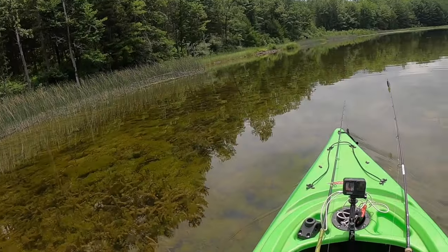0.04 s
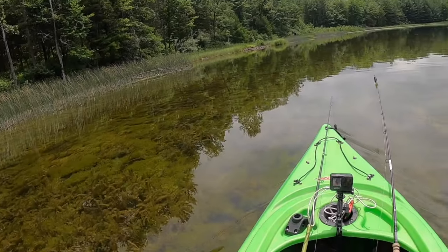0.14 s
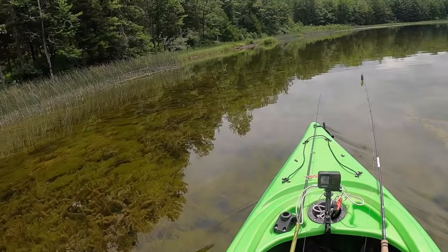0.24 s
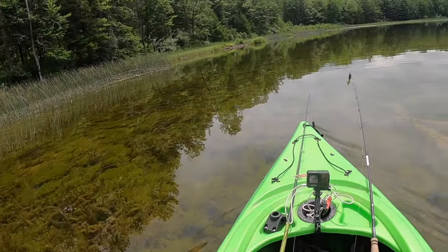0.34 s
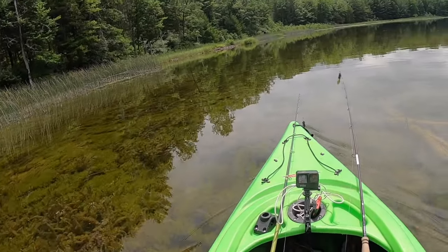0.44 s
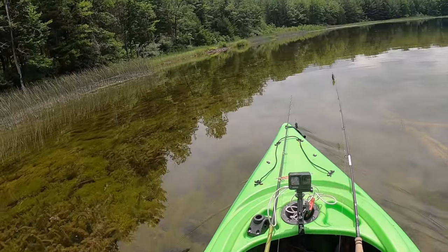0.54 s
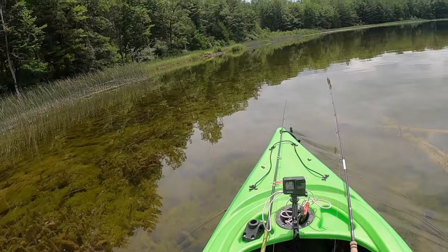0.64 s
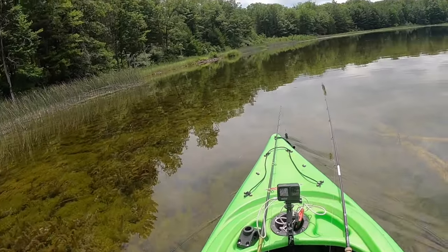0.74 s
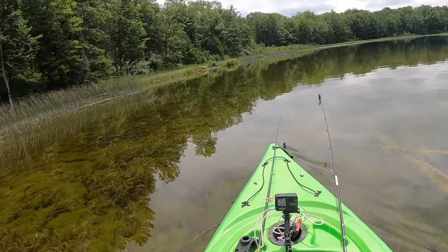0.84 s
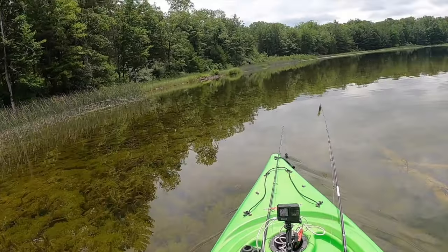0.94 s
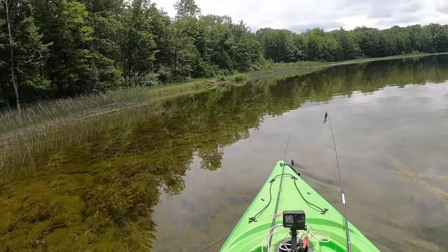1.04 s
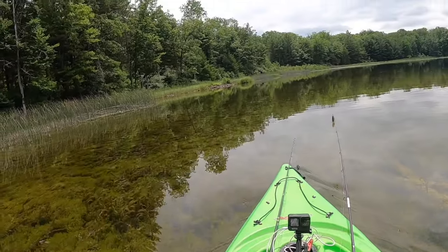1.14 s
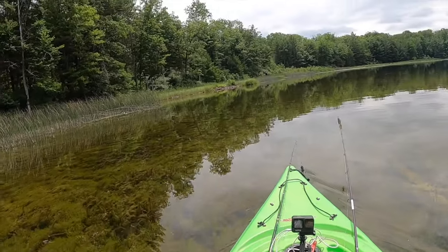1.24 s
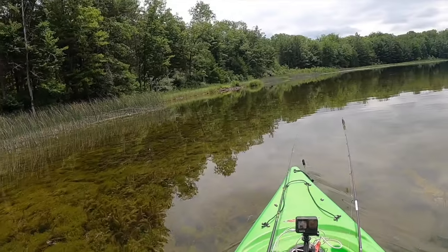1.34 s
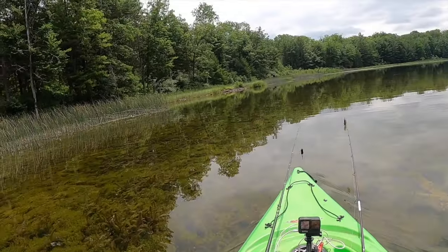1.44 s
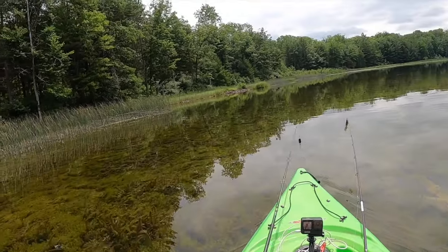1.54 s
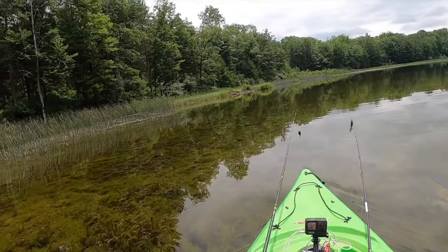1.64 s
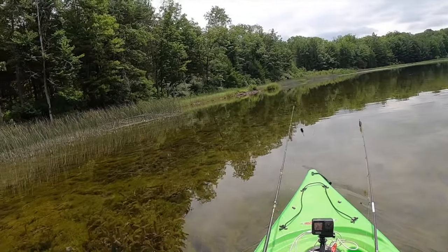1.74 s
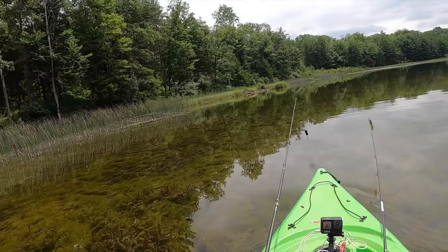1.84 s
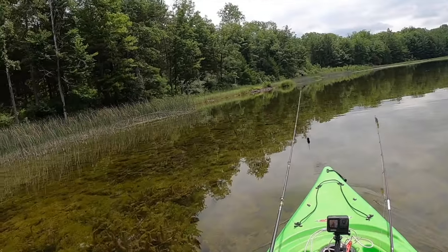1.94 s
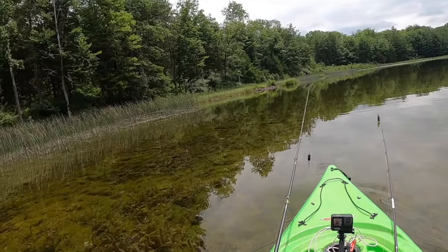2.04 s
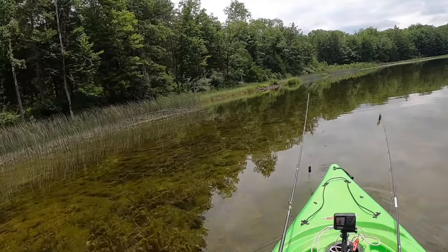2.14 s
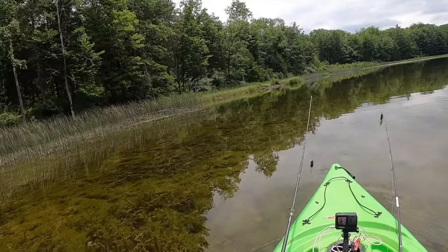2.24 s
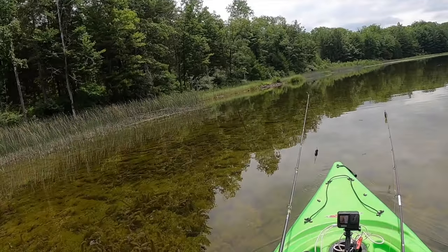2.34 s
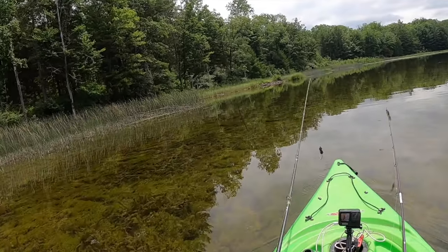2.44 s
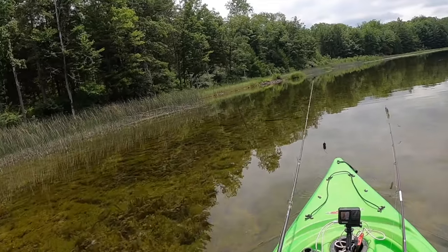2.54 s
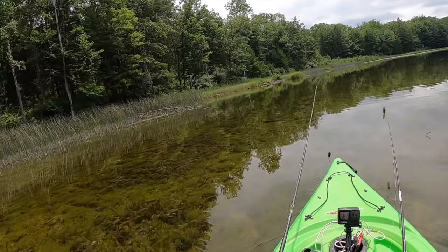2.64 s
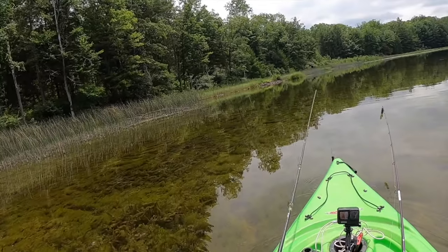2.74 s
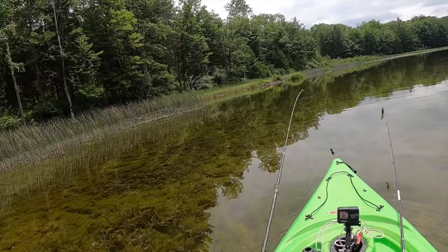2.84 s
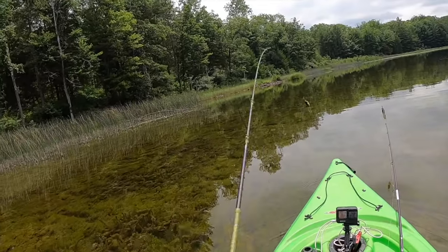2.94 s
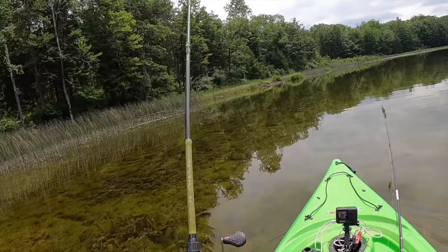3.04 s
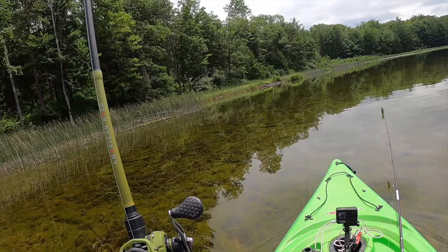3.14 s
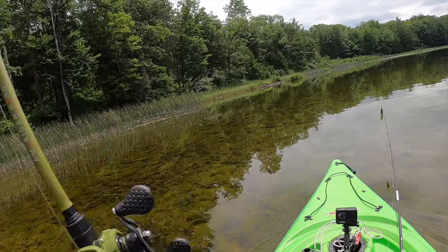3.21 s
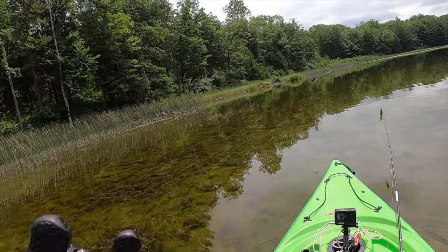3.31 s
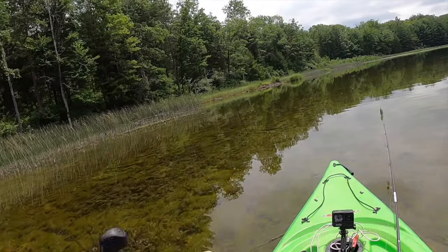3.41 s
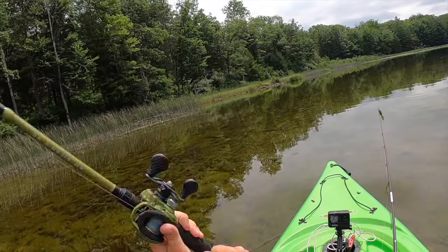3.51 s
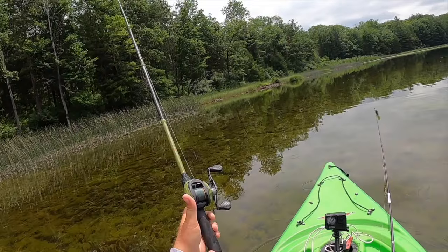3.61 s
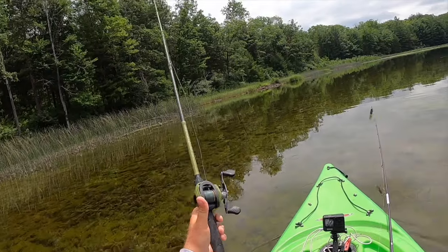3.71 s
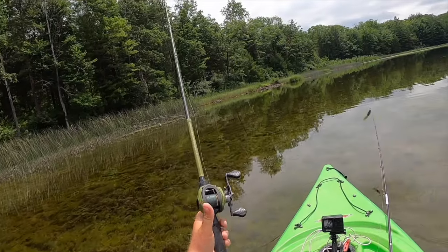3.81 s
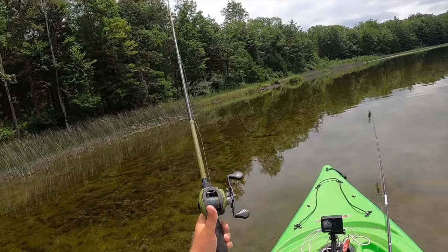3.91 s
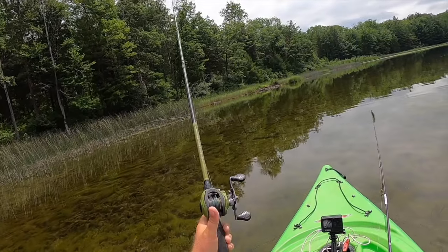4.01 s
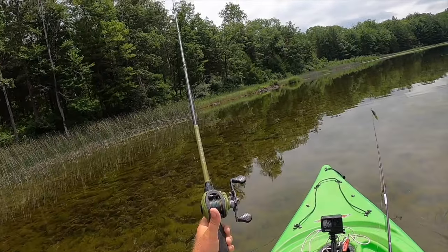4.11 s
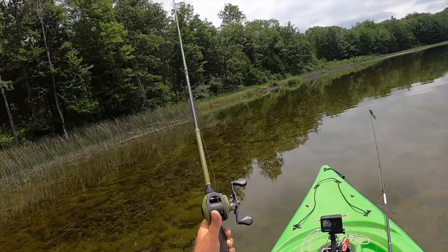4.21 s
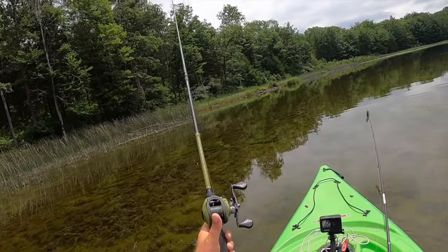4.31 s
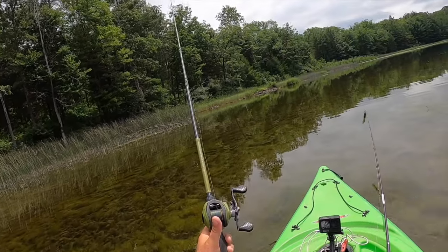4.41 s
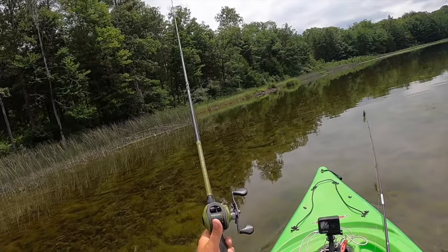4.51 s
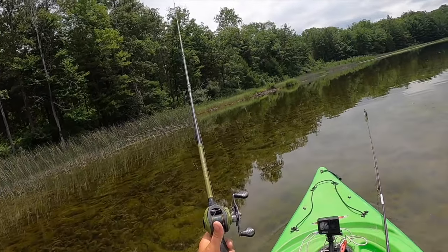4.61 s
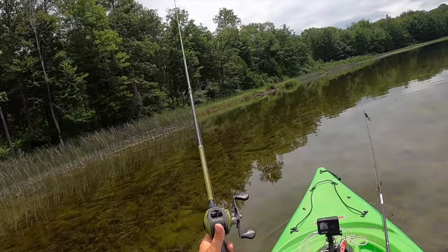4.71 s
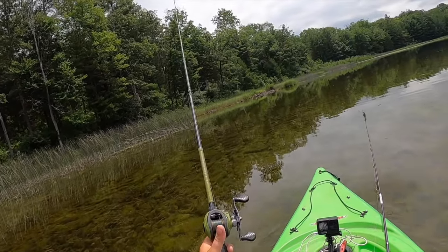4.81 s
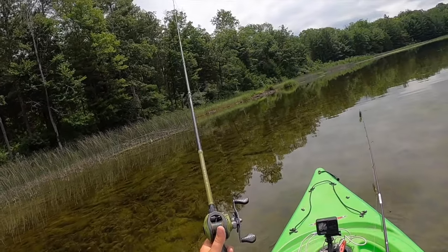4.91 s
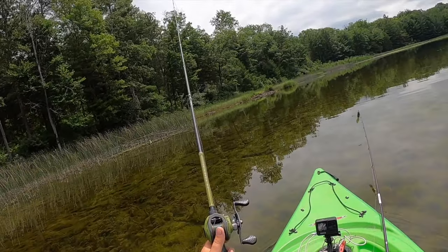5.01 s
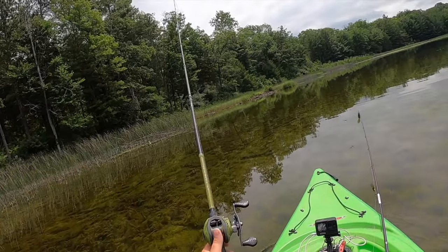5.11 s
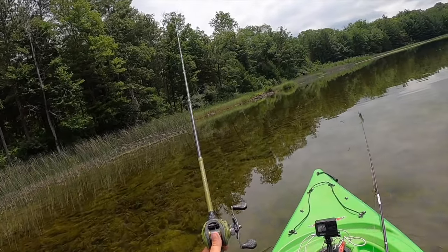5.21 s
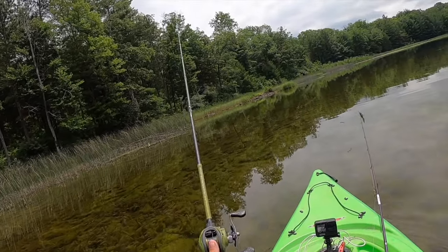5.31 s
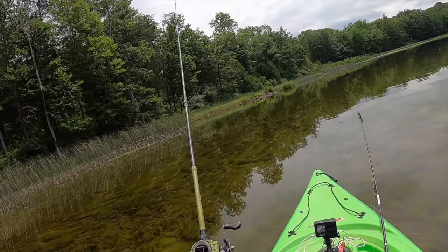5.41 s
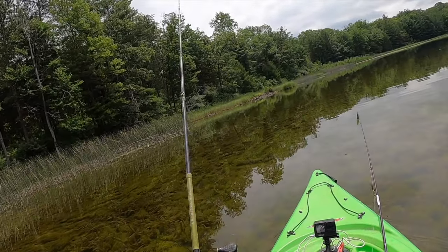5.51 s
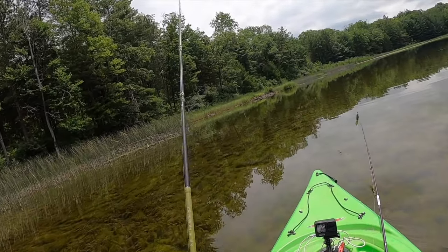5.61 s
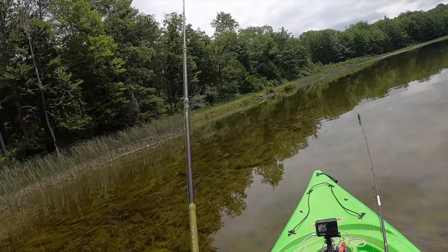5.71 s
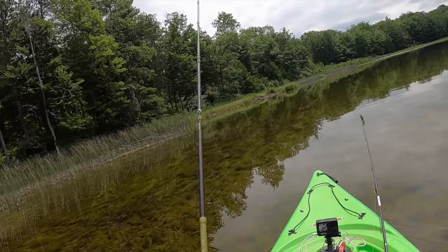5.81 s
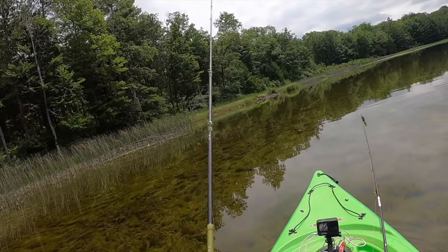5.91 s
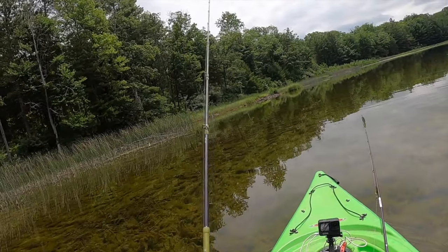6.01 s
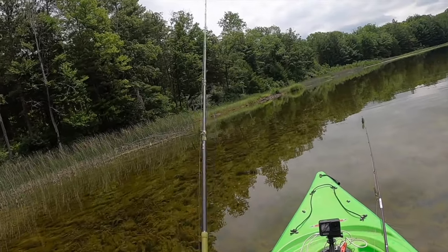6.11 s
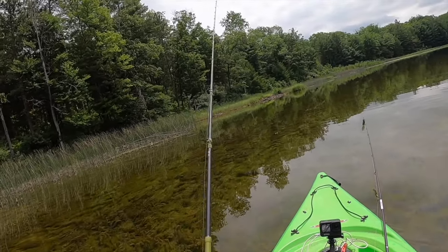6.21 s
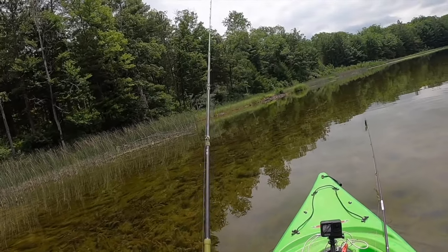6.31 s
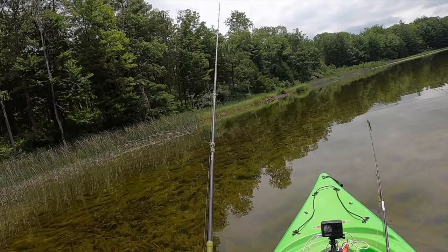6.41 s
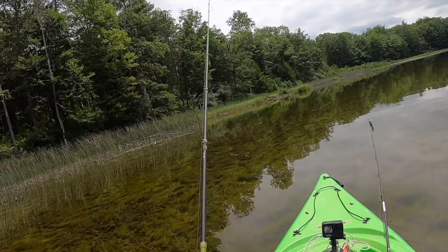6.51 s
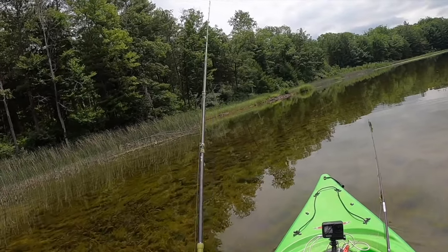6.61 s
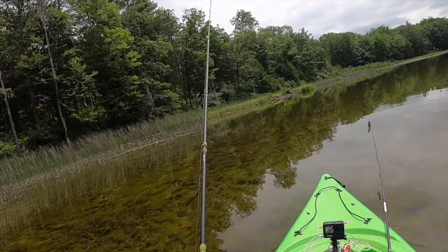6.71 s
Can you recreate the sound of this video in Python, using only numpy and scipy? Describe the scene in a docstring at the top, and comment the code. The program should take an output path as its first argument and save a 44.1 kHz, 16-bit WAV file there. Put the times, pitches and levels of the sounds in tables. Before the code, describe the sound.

A fishing reel gives three crisp metallic clacks close by, with small ticks between them. A brief whoosh of the rod follows, then a faint slowing spool whir and the hiss of line, before the reel snaps back with a final click. Soft knocks come from the kayak. Around it all is a calm wooded lakeshore with distant warbling birds, light leaf rustle and a barely audible motor hum.

```python
"""Calm lake, from a kayak: one cast. The reel's clutch clacks three times, contacts ringing its frame;
reeds and trees echo it. The rod swishes, the spool whirs down as line runs out, the clutch snaps back.
Songbirds call from the wooded shore, a fly's wings buzz past, sleeves rub, the hull knocks, water plops.
Behind it all: low rumble, leaf rustle, a fine high hiss and a far motor's hum."""
import sys
import numpy as np
from scipy import signal
from scipy.fft import rfft, irfft
from scipy.io import wavfile
from scipy.ndimage import uniform_filter1d

SR = 44100
rng = np.random.default_rng(int(sys.argv[2]) if len(sys.argv) > 2 else 0)


def digitize_waveform(pressure):
    """Quantize a signal to 16-bit integers and store it at the path in sys.argv[1].

    Rows of a 2-D input are taken as channels; values are limited to [-1, 1].
    """
    field = np.atleast_2d(pressure).T
    bounded = np.clip(field, -1, 1)
    quanta = np.round(bounded * 32767).astype(np.int16)
    wavfile.write(sys.argv[1], SR, quanta)


N = 297675
TIME_S = np.arange(N) / SR

# far motor: time_s, level_db
MOTOR_LEVELS = [(0, -63.5), (2.3, -66), (2.8, -80), (4.8, -81.5), (5.3, -68.5), (6.75, -80)]
# low rumble: freq_hz, gain_db
RUMBLE_SPECTRUM = [(15, -24), (35, -3.5), (75, -4), (120, -2.5), (170, 2.5), (260, -6.5), (400, -14.5),
                   (800, -23.5), (2000, -58)]
# open air: time_s, leaves_db, fine_hiss_db
AIR_LEVELS = [(0, -57, -74), (1.3, -64, -75), (2.3, -62.5, -74.5), (2.75, -70, -79), (3.5, -58, -70),
              (5.0, -73.5, -66), (5.5, -59, -71.5), (6.75, -61.5, -66.5)]
# leaves: freq_hz, gain_db
LEAF_SPECTRUM = [(210, -47.5), (350, -2), (487, -9), (542, -13), (780, -10), (1240, 1), (1480, -4.5),
                 (1760, -7.5), (2150, -5.5), (2550, -4.5), (2780, -0.5), (3520, -10.5), (4500, -47.5),
                 (5850, -49), (9900, -120)]
# fine high hiss: freq_hz, gain_db
FINE_HISS_SPECTRUM = [(2350, -6.5), (4000, -0.5), (4490, -3.5), (5160, -1), (5830, -3), (6880, -6.5),
                      (7510, -5.5), (7990, -13.5), (8870, -9.5), (10800, -24.5), (12700, -21.5),
                      (13700, -33), (15000, -44.5)]
# rubs, and high hissy tails echoing after the first two clacks (1.768 s, 2.468 s):
# middle_s, length_s, level_db, centre_hz, spread_oct
RUBS_AND_TAILS = [(.02, 0.057, -49.5, 2000, 0.99), (0.252, 0.034, -54, 2030, 0.66),
                  (0.334, 0.074, -48.5, 2550, 0.58), (0.509, 0.36, -54.5, 1154, 0.39),
                  (0.681, 0.084, -52.5, 1180, 0.67), (1.768, 0.29, -62.5, 7600, .6),
                  (2.468, 0.35, -68, 5140, 0.6), (3.236, 0.094, -59, 1283, 0.97),
                  (3.329, .3, -71, 3500, 1.9), (4.705, 0.052, -55.5, 1440, 0.49),
                  (4.722, 0.08, -56, 11720, 0.077), (5.308, 0.052, -56.5, 7010, 1.9),
                  (5.645, 0.28, -63, 950, 1.23)]
# knocks on hull and grip, one water plop (0.529 s): start_s, level_db, pitch_hz, t60_s, tap_db
KNOCKS_AND_PLOP = [(0.027, -45.5, 760, 0.041, 4), (0.197, -48, 240, 0.065, -11),
                   (0.317, -45.5, 670, 0.013, 5.5), (0.529, -41.5, 592, 0.1, 3.5),
                   (0.665, -48, 1140, 0.027, 2), (0.685, -47.5, 460, 0.052, 3.5),
                   (3.475, -40.5, 109, 0.086, 2), (3.551, -47.5, 1190, 0.01, 5),
                   (3.634, -31.5, 384, 0.019, 0.5), (3.713, -32, 328, 0.041, -13),
                   (3.721, -30.5, 610, 0.032, -4), (5.542, -42.5, 1000, 0.018, -5.5),
                   (5.572, -39.5, 378, 0.026, -12), (5.588, -41.5, 328, 0.05, -16),
                   (5.883, -43, 288, 0.034, -9)]
# small bird's whistles: start_s, length_s, level_db, top_hz, trill_depth_hz
BIRD_WHISTLES = [(0.475, 0.48, -74, 7460, 270), (1.181, 0.6, -79.5, 7300, 120),
                 (2.736, 0.51, -78, 7430, 16), (5.519, 0.43, -73.5, 7430, 15)]
# warbles: start_s, length_s, level_db, first_hz, last_hz, slurs_per_s, depth_ratio (+ falls, - rises)
BIRD_PHRASES = [(.71, 0.31, -64.5, 2720, 2307, 4.5, .14), (1.228, 0.098, -61, 2515, 3240, 8.5, 0.12),
                (1.372, 0.31, -56, 2893, 2440, 7, 0.05), (1.905, .12, -68.5, 3034, 2753, 14, -0.18),
                (2.042, 0.24, -65, 2820, 2280, 6.7, 0.058), (2.731, 0.28, -69.5, 2260, 2780, 13, -0.096),
                (3.015, 0.14, -66.5, 3320, 2200, 20.4, 0.12), (4.691, 0.4, -68, 4240, 4320, 4.1, .006),
                (5.29, .21, -59.5, 4080, 3517, 3.5, .05), (5.3, .3, -58, 3513, 2660, 13, 0.15),
                (5.669, 0.198, -55, 2363, 2530, 9, -0.093), (5.83, 0.26, -57.5, 3980, 2776, 2.95, 0.088),
                (6.155, 0.16, -56, 3200, 2034, 2.9, -0.04), (6.401, 0.079, -56.5, 2400, 2904, 12, -0.023)]
# reel resonances: freq_hz, width_hz, level_db
REEL_MODES = [(815, 280, -8.5), (1164, 260, -9.5), (1350, 280, -6), (1734, 240, -16.5), (2300, 400, -3.5),
              (2480, 370, -4), (2804, 170, 5.5), (3264, 660, 0.5), (3950, 690, -10), (4620, 820, -4.5),
              (5130, 1200, -4.5), (5910, 560, -5), (7190, 480, -5), (8870, 350, -4), (9950, 1300, -13),
              (11000, 1000, -29.5), (11800, 280, -18.5)]
# clutch snaps: strike_s, peak_db, gap_s, build_db_per_contact, loss_db_per_rebound,
# thud_db, ring_db, bright_db, tick_db
CLUTCH_CLACKS = [(1.6793, -11.5, .0015, 21, 13, 1.5, -8.5, -4.5, -4.5),
                 (2.2686, -5.5, 0.0015, 13.5, 11.5, 1.5, 8, 8.5, 5),
                 (2.9591, -13.5, .0018, 21, 21.5, 2.5, 2, -4, -5.5),
                 (5.7913, -12, .002, 7.5, 7, 1, 9, 1.5, 0)]
# handle and spool ticks: start_s, peak_db, tilt_db_per_oct
REEL_TICKS = [(1.7128, -30.5, 5.5), (2.0444, -53, 2), (2.1733, -45.5, 2.5), (2.2144, -43.5, 3.5),
              (2.2563, -31.5, -2), (2.336, -35, -7), (2.4, -44, -4), (2.934, -46.5, -9), (2.9497, -37, 0),
              (4.364, -38.5, 9.5), (5.62, -37, -12), (5.718, -33, -12), (6.3225, -41, -5)]
# rod backswing, whip, follow-through: peak_s, level_db, rise_s, fall_s, bright_share
ROD_STROKES = [(3.65, -48, 0.037, 0.19, 0.063), (3.727, -32.5, .017, 0.014, 0.024),
               (3.772, -36, 0.037, 0.044, 0.96)]
# dull swish: freq_hz, gain_db
DULL_SWISH_SPECTRUM = [(35, -35), (60, 4), (201, -10.5), (272, -2.5), (642, -1.5), (1420, -10.5),
                       (1700, -3), (1870, -10), (2470, -7), (3840, -12), (5450, -12), (7540, -18.5),
                       (15500, -55)]
# bright swish: freq_hz, gain_db
BRIGHT_SWISH_SPECTRUM = [(35, -47), (60, -28), (210, 1), (368, -19), (738, -7), (976, -1.5), (1200, -2.5),
                         (1630, -5.5), (2360, 2.5), (3580, -5), (8670, -7.5), (12000, -19), (15500, -30)]
# line running out: time_s, whir_db, hiss_db
LINE_LEVELS = [(3.83, -52.5, -58), (4.226, -61, -54.5), (5.07, -70, -77.5), (5.33, -64.5, -66.5)]
# spool whir: freq_hz, gain_db
WHIR_SPECTRUM = [(120, -40), (200, -4.5), (300, -1), (346, -27), (504, -9), (755, -16.5), (838, -31),
                 (1010, -3.5), (1130, -7.5), (1570, -2), (1760, -6), (2030, 2.5), (4500, -18), (5850, -38),
                 (9900, -120)]
# line in the guides: freq_hz, gain_db
LINE_HISS_SPECTRUM = [(2060, -15), (3500, -2), (5020, -7), (5380, -6), (5800, -4.5), (6690, -6), (7340, -2),
                      (7960, -9), (8630, 2.5), (8960, -0.5), (10300, -6), (12500, -11.5), (15500, -21)]
# fly's wingbeat: harmonic, level_db
WING_HARMONICS = [(1, 3.5), (2, -3.5), (3, -43), (4, -12.5), (5, -12.5), (6, -14.5)]
# near stereo balance: freq_hz, left_minus_right_db
NEAR_BALANCE = [(100, 2), (300, -1), (700, 0.5), (1300, -0.5), (2700, 2.5), (5500, 1), (7300, 1.5),
                (8500, -3.5), (10000, -2.5), (13000, -8)]
# near left-right likeness: freq_hz, correlation
NEAR_CORRELATION = [(60, 0.85), (240, 0.36), (950, 0.82), (3770, 0.48), (15000, 0.16)]
# far stereo balance: freq_hz, left_minus_right_db
FAR_BALANCE = [(60, 2.5), (130, 0), (290, -3.5), (640, -3.5), (1410, 1.5), (3100, 3.0), (6820, 4),
               (15000, -7.5)]
# far left-right likeness: freq_hz, correlation
FAR_CORRELATION = [(60, 0.98), (240, 0.45), (950, 0.5), (3770, 0.18), (15000, 0.045)]


def gain_of(db):
    """Decibels to amplitude."""
    return 10 ** (np.asarray(db) / 20)


def unit_rms(x):
    """Scales to rms 1."""
    return x / np.sqrt(np.mean(x ** 2) + 1e-20)


def at_freq(points, hz):
    """Interpolates on a log-frequency axis."""
    freq_hz, value = np.transpose(points)
    return np.interp(np.log(hz + 1), np.log(freq_hz + 1), value)


def curve(rows, column=1):
    """One column of a time table, per sample."""
    columns = np.transpose(rows)
    return np.interp(TIME_S, columns[0], columns[column])


def gate(start_s, end_s, fade_s):
    """1 from start to end, linear fades outside."""
    return np.interp(TIME_S, [start_s - fade_s, start_s, end_s, end_s + fade_s], [0, 1, 1, 0])


def add(mix, start_s, sound):
    """Mixes a sound in, in place."""
    part = mix[..., max(round(start_s * SR), 0):][..., :sound.shape[-1]]
    part += sound[..., :part.shape[-1]]


def wander(hz):
    """Random drift of rms 1, low-passed at hz."""
    freq_hz = np.fft.rfftfreq(N, 1 / SR)
    return unit_rms(irfft(rfft(rng.standard_normal(N)) / (1 + (freq_hz / hz) ** 4), N))


def colour(x, spectrum):
    """Filters by (freq_hz, gain_db) points."""
    size = x.shape[-1]
    return irfft(rfft(x) * gain_of(at_freq(spectrum, np.fft.rfftfreq(size, 1 / SR))), size)


def pan(x, balance, left_lag_s=0):
    """Stereo placement, band by band."""
    hz = np.fft.rfftfreq(N, 1 / SR)
    half = gain_of(at_freq(balance, hz) / 2)
    return irfft(rfft(x) * np.array([half * np.exp(-2j * np.pi * hz * left_lag_s), 1 / half]), N)


def noise(spectrum, correlation):
    """Partly correlated stereo noise, rms 1."""
    left, other = rfft(rng.standard_normal((2, N)))
    likeness = at_freq(correlation, np.fft.rfftfreq(N, 1 / SR))
    right = likeness * left + np.sqrt(1 - likeness ** 2) * other
    return unit_rms(colour(irfft(np.array([left, right]), N), spectrum))


def echo(x, delay_s, rise_s, t60_s, correlation, spectrum):
    """Diffuse echo: delay, swell, decay."""
    t = np.maximum(np.arange(SR) / SR - delay_s, 0)
    shared, *own = rng.standard_normal((3, SR))
    tail = colour(np.sqrt(correlation) * shared + np.sqrt(1 - correlation) * np.array(own), spectrum)
    tail *= (1 - np.exp(-t / rise_s)) * gain_of(-60 * t / t60_s)
    return signal.fftconvolve(np.atleast_2d(x), tail / np.linalg.norm(tail[0]), axes=1)[:, :N]


def rumble():
    """Low noise; its level loosely follows the motor."""
    motor_db = curve(MOTOR_LEVELS)
    level_db = -63.5 + 0.16 * (motor_db - motor_db.mean())
    return noise(RUMBLE_SPECTRUM, FAR_CORRELATION) * gain_of(level_db + 1.86 * wander(hz=9))


def leaves_and_hiss():
    """Leaf rustle, plus a fine high hiss that rises once the line is out."""
    leaves = noise(LEAF_SPECTRUM, FAR_CORRELATION)
    leaves *= gain_of(curve(AIR_LEVELS, column=1) + 2.9 * wander(hz=14.3) - 4)
    fine = noise(FINE_HISS_SPECTRUM, FAR_CORRELATION)
    fine *= gain_of(curve(AIR_LEVELS, column=2) + 1.4 * wander(hz=9))
    return leaves + fine


def motor(pitch_hz=77.2):
    """Far hum plus its octave; comes and goes."""
    phase = 2 * np.pi * np.cumsum(pitch_hz * (1 + 0.022 * wander(hz=7))) / SR
    hum = unit_rms(np.sin(phase) + 0.19 * np.sin(2 * phase))
    return hum * gain_of(curve(MOTOR_LEVELS) + 2.5 * wander(hz=5.7))


def rubs_and_tails():
    """Short swells of grainy noise: rubs, and hissy tails after two clacks."""
    out = np.zeros((2, N))
    for middle_s, length_s, level_db, centre_hz, spread_oct in RUBS_AND_TAILS:
        size = int(length_s * SR)
        shared, *own = rng.standard_normal((3, SR))[:, :size]
        distance = np.log2((np.fft.rfftfreq(size, 1 / SR) + 1) / centre_hz) / spread_oct
        band = irfft(rfft(shared + 0.17 * np.array(own)) / (1 + distance ** 2 / 2) ** 2, size)
        envelope = gain_of(level_db) * np.sqrt(np.hanning(size))
        add(out, middle_s - length_s / 2, envelope * unit_rms(band))
    grain = unit_rms(gain_of(2.1 * wander(hz=133)))
    return colour(out, [(6500, 0), (10000, -11), (15000, -14.5)]) * grain


def knocks_and_plop(tap_decay_s=0.0078, attack_s=0.00047):
    """Each is a soft tap plus one damped resonance; the water plop rings longest."""
    t, out = np.arange(8192) / SR, np.zeros(N)
    tap_spectrum = [(100, 6), (600, 1.5), (1300, -0.5), (2500, -9), (6000, -73), (14000, -60)]
    for start_s, level_db, pitch_hz, t60_s, tap_db in KNOCKS_AND_PLOP:
        tap = unit_rms(colour(rng.standard_normal(len(t)), tap_spectrum))
        tap *= 0.61 * gain_of(tap_db) * np.exp(-t / tap_decay_s)
        ring = np.sin(2 * np.pi * pitch_hz * t) * gain_of(-60 * t / t60_s)
        add(out, start_s, gain_of(level_db) * (ring + tap) * (1 - np.exp(-t / attack_s)))
    return out


def chirp(pitch_hz, envelope, waver):
    """Bird tone: unsteady sine, soft ends, rms 1."""
    jitter = unit_rms(uniform_filter1d(rng.standard_normal(SR), size=150))[:len(pitch_hz)]
    phase = 2 * np.pi * np.cumsum(pitch_hz * (1 + waver * jitter)) / SR
    return unit_rms(envelope * np.sin(phase) * signal.windows.tukey(len(pitch_hz), 0.3))


def whistle(length_s, level_db, top_hz, trill_depth_hz, trill_rate_hz=40.4, fade_db=4):
    """One fading arch of pitch; a trill shakes pitch and level."""
    t = np.arange(int(length_s * SR)) / SR
    trill = np.sin(2 * np.pi * trill_rate_hz * t)
    arch_hz = top_hz * (1 - 0.071 * (2 * t / length_s - 1) ** 2)
    envelope = (1 + min(trill_depth_hz / 250, 1) * trill) * gain_of(-fade_db * t / length_s)
    return gain_of(level_db) * chirp(arch_hz + trill_depth_hz * trill, envelope, waver=0.0028)


def phrase(length_s, level_db, first_hz, last_hz, slurs_per_s, depth_ratio, dip_db=7.5):
    """Pitch swings about a glide; the level dips on each return."""
    t = np.arange(int(length_s * SR)) / SR
    swing = 2 * np.pi * slurs_per_s * t
    pitch_hz = np.geomspace(first_hz, last_hz, len(t)) * (1 + depth_ratio * np.sin(swing))
    envelope = gain_of(-dip_db * np.cos(swing / 2) ** 2)
    return gain_of(level_db) * chirp(pitch_hz, envelope, waver=0.017)


def far_songs(count=18, centre_hz=2703, spread_oct=0.22):
    """Birds deep in the forest: faint phrases, random times and pitches."""
    out = np.zeros(N)
    for when, first, last, pace, slur in rng.uniform(-1, 1, (count, 5)):
        first_hz, last_hz = centre_hz * 2 ** (spread_oct * np.array([first, last]))
        song = phrase(length_s=0.16, level_db=-70.5, first_hz=first_hz, last_hz=last_hz,
                      slurs_per_s=10 * 2 ** (pace / 2), depth_ratio=0.12 * np.sign(slur))
        add(out, (when + 1) / 2 * TIME_S[-1], song)
    return out


def birds():
    """Shore songs blurred by the forest; the whistler is nearer, so drier."""
    warbles, whistles = far_songs(), np.zeros(N)
    for start_s, *row in BIRD_PHRASES:
        add(warbles, start_s, phrase(*row))
    for start_s, *row in BIRD_WHISTLES:
        add(whistles, start_s, whistle(*row))
    warbles *= gain_of(4 * wander(hz=60) - 4)
    whistles *= gain_of(1.4 * wander(hz=40.8))
    forest = echo(warbles + gain_of(-1.5) * whistles, delay_s=0.0085, rise_s=0.0146, t60_s=0.82,
                  correlation=0.27, spectrum=[(1000, 0), (9000, -1)])
    return gain_of(-2.5) * (warbles + whistles) + gain_of(-3.5) * forest


def contact(peak_db, thud_db, ring_db, bright_db, tick_db, trail_s=0.0009):
    """One metal contact rings the reel's modes; where it lands sets the colour."""
    size = 4096
    hz = np.fft.rfftfreq(size, 1 / SR)
    power = sum(gain_of(mode_db) ** 2 / (1 + ((hz - mode_hz) / width_hz * 1.38) ** 2) ** 2
                for mode_hz, width_hz, mode_db in REEL_MODES)
    tone = [(1200, thud_db), (2200, ring_db), (3000, 0), (5500, bright_db), (10000, tick_db)]
    log_gain = np.log(np.sqrt(power) * gain_of(at_freq(tone, hz)) + 1e-5)
    mirrored = np.r_[log_gain, log_gain[-2:0:-1]]
    minimum_phase = np.exp(np.conj(signal.hilbert(mirrored))[:len(hz)])
    # bending waves in the frame: lows trail the treble
    trail_cycles = np.cumsum(trail_s * np.exp(-hz / 6000)) * SR / size
    click = irfft(minimum_phase * np.exp(-2j * np.pi * trail_cycles)) * np.hanning(2 * size)[size:]
    return gain_of(peak_db) * click / abs(click).max()


def clutch(gap_ratio=0.85, glance_db=5):
    """Chatters up to the strike (k = 0), then rebounds faster and softer."""
    out = np.zeros(N)
    for strike_s, peak_db, gap_s, build_db, loss_db, *tone_db, tick_db in CLUTCH_CLACKS:
        for k in range(-2, 4):
            offset_s = gap_s * (1 - gap_ratio ** k) / (1 - gap_ratio)
            level_db = peak_db - abs(k) * (build_db if k < 0 else loss_db)
            add(out, strike_s + offset_s, contact(level_db, *tone_db, tick_db + glance_db * (k != 0)))
    return out


def reel_ticks(ring_boost_db=9):
    """Single light contacts; they favour the frame's ring near 2.2 kHz."""
    out = np.zeros(N)
    bands_oct = np.log2(np.array([1200, 2200, 5500, 10000]) / 3000)
    for start_s, peak_db, tilt_db_per_oct in REEL_TICKS:
        thud_db, ring_db, bright_db, tick_db = tilt_db_per_oct * bands_oct
        add(out, start_s, contact(peak_db, thud_db, ring_db + ring_boost_db, bright_db, tick_db))
    return out


def lake_echoes(x):
    """Cockpit and deck reflect first, then reeds, then the tree line."""
    cockpit = echo(x, delay_s=0.00046, rise_s=0.0004, t60_s=0.034, correlation=0.35,
                   spectrum=[(200, -13), (600, 9), (2500, 2), (5000, -3.5), (12000, -10)])
    deck = echo(x, delay_s=0.0043, rise_s=0.0083, t60_s=0.11, correlation=1,
                spectrum=[(200, -4.5), (600, 1), (2500, -9), (5000, -11.5), (12000, -19)])
    reeds = echo(x, delay_s=0.033, rise_s=0.008, t60_s=0.46, correlation=0.37,
                 spectrum=[(500, -12.5), (2800, 2), (4500, -8.5), (6500, 6.5), (9000, -3), (13000, -5)])
    trees = echo(x, delay_s=0.3, rise_s=0.06, t60_s=0.2, correlation=0.49,
                 spectrum=[(500, -32), (3200, -0.5), (4500, -16), (9000, -15)])
    return gain_of(-10) * cockpit + gain_of(-24.5) * deck + gain_of(-31.5) * reeds + gain_of(-41) * trees


def rod_swish():
    """Each stroke swells with rod speed and dies; the follow-through is brighter."""
    dull_power, bright_power = np.zeros((2, N))
    for peak_s, level_db, rise_s, fall_s, bright_share in ROD_STROKES:
        t = TIME_S - peak_s
        envelope = gain_of(level_db) * np.exp(-np.where(t < 0, (t / rise_s) ** 2 / 2, t / fall_s))
        dull_power += envelope ** 2 * (1 - bright_share)
        bright_power += envelope ** 2 * bright_share
    dull = np.sqrt(dull_power) * noise(DULL_SWISH_SPECTRUM, NEAR_CORRELATION)
    bright = np.sqrt(bright_power) * noise(BRIGHT_SWISH_SPECTRUM, NEAR_CORRELATION)
    return (dull + bright) * gain_of(2 * wander(hz=204))


def spool_turns(release_s=3.7, spin_up_s=0.09, unbraked_hz=552, braking_s=0.237):
    """Running turn count: quick spin-up, then brake drag as speed squared."""
    t = np.maximum(TIME_S - release_s, 0)
    speed_hz = unbraked_hz * (1 - np.exp(-t / spin_up_s)) / (1 + t / braking_s)
    return np.cumsum(speed_hz * (1 + 0.004 * wander(hz=39.4))) / SR


def spool_whir(turns):
    """Line leaves in one flick a turn, over noise."""
    flicks = unit_rms(colour(np.diff(np.floor(turns), prepend=0), WHIR_SPECTRUM))
    whir = 0.4 * flicks + 1.04 * noise(WHIR_SPECTRUM, NEAR_CORRELATION)
    return whir * gain_of(curve(LINE_LEVELS, column=1) + 0.5 + 1.96 * wander(hz=25))


def line_hiss(turns, ticks_per_s=110):
    """Loose coils slap the guides in clumps, some as fine ticks."""
    clumps = gain_of(2.1 * wander(hz=88) + 0.85 * wander(hz=14))
    flutter = unit_rms((1 + 0.095 * np.cos(2 * np.pi * turns)) * clumps)
    impulses = rng.exponential(1, N) * (rng.random(N) < ticks_per_s / SR)
    ticks = unit_rms(colour(impulses, LINE_HISS_SPECTRUM))
    hiss = noise(LINE_HISS_SPECTRUM, NEAR_CORRELATION) * flutter + 0.51 * ticks
    return hiss * gain_of(curve(LINE_LEVELS, column=2) - 1.3)


def bearing_whine(turns, cycles_per_turn=56.5, start_s=4.3, rise_s=0.097):
    """Fuzzy tone falling with spool speed; a lower tone and the octave join briefly."""
    phase = 2 * np.pi * cycles_per_turn * turns
    lower = 0.7 * wander(hz=170) * np.sin(0.77 * phase)
    octave = 0.52 * wander(hz=300) * np.sin(2 * phase)
    whine = wander(hz=200) * np.sin(phase) + (lower + octave) * gate(4.95, 5.08, fade_s=0.09)
    return whine * gain_of(-66 + 2.2 * wander(hz=20)) * np.clip((TIME_S - start_s) / rise_s, 0, 1)


def line_run():
    """The turning spool drives whir, hiss and whine."""
    turns = spool_turns()
    running = gate(LINE_LEVELS[0][0], LINE_LEVELS[-1][0], fade_s=0.041)
    return (spool_whir(turns) + line_hiss(turns) + bearing_whine(turns)) * running


def fly(start_s=4.22, stay_s=0.39, level_db=-61, wingbeat_hz=152, sag_hz_per_s=11):
    """Wavering wingbeat harmonics, sagging as the fly passes."""
    pitch_hz = wingbeat_hz - sag_hz_per_s * (TIME_S - start_s)
    phase = 2 * np.pi * np.cumsum(pitch_hz * (1 + 0.0085 * wander(hz=19.2))) / SR
    buzz = unit_rms(sum(gain_of(db) * np.sin(harmonic * phase) for harmonic, db in WING_HARMONICS))
    return buzz * gain_of(level_db + 2.1 * wander(hz=26)) * gate(start_s, start_s + stay_s, fade_s=0.11)


def scene():
    """Gear close by, the lake far around it."""
    reel = clutch() + reel_ticks()
    near = reel + lake_echoes(reel) + knocks_and_plop() + rubs_and_tails()
    near += rod_swish() + line_run() + fly()
    far = rumble() + leaves_and_hiss() + motor() + birds()
    return pan(near, NEAR_BALANCE, left_lag_s=0.00002) + pan(far, FAR_BALANCE)


def record(dry):
    """Low-pass at 15.9 kHz."""
    lowpass = signal.firwin(255, 15900, window=("kaiser", 9), fs=SR)
    return signal.oaconvolve(dry, lowpass[None], "same", axes=1)


dry = scene()
out = record(dry)
digitize_waveform(out)
```